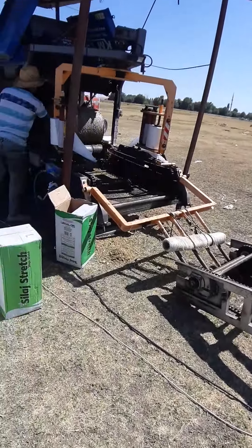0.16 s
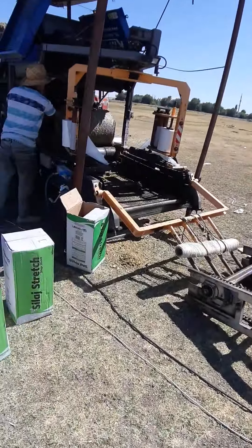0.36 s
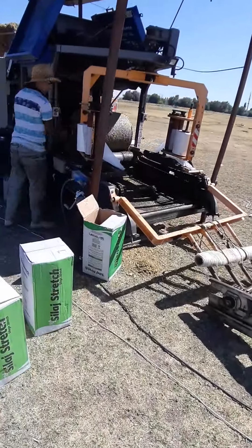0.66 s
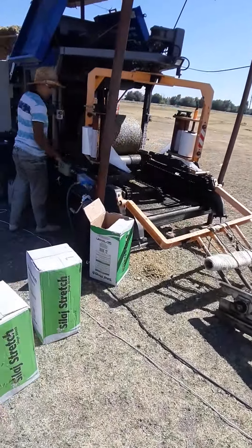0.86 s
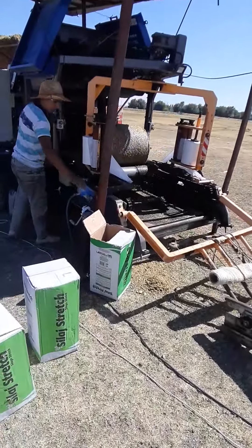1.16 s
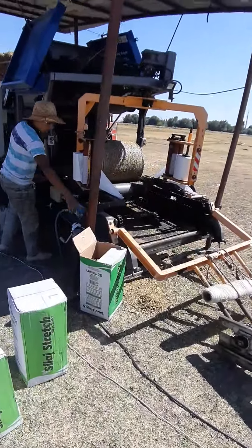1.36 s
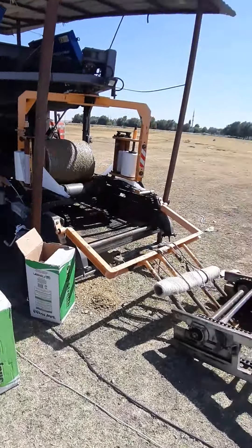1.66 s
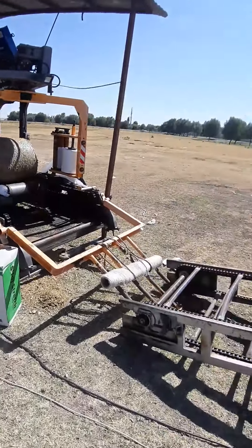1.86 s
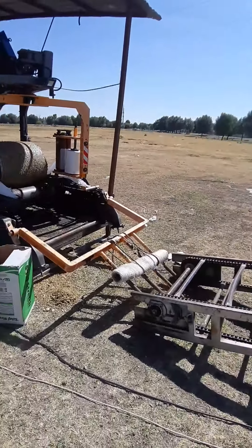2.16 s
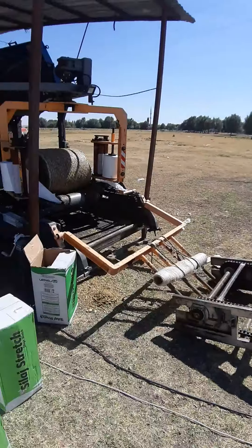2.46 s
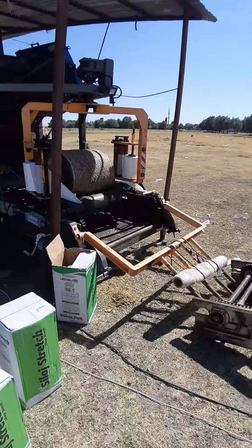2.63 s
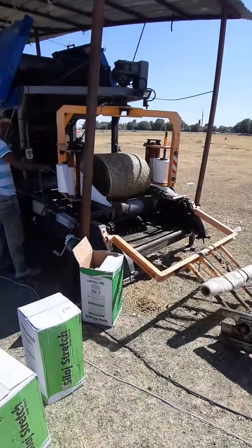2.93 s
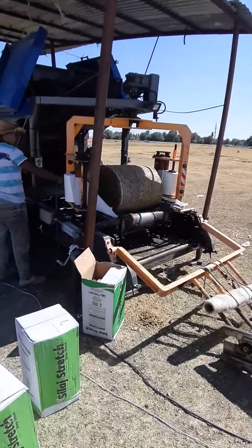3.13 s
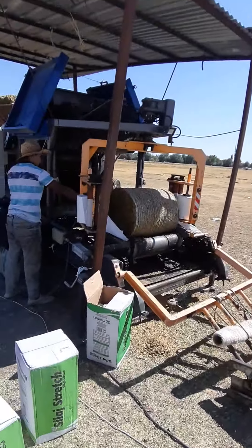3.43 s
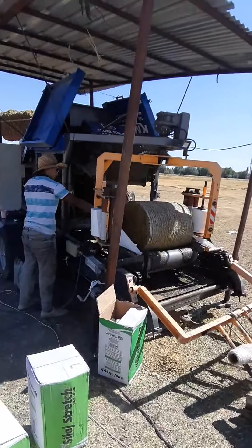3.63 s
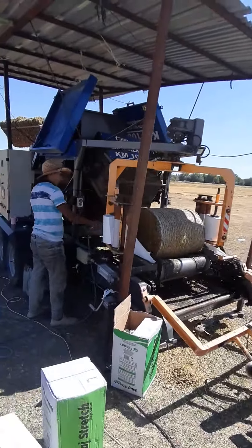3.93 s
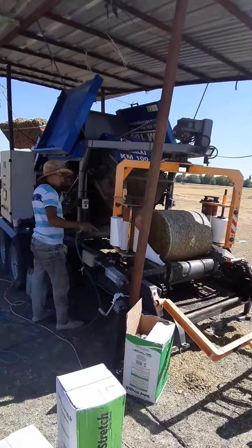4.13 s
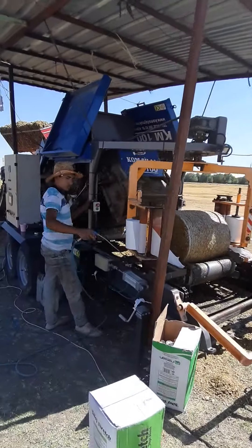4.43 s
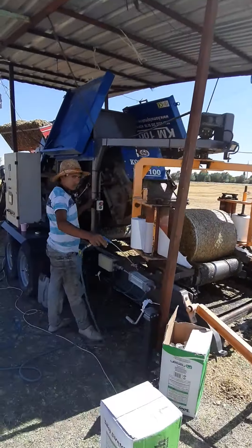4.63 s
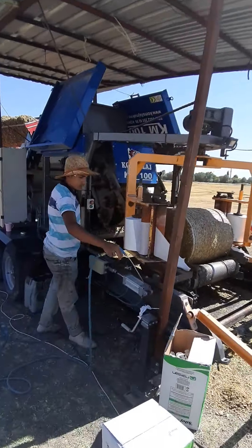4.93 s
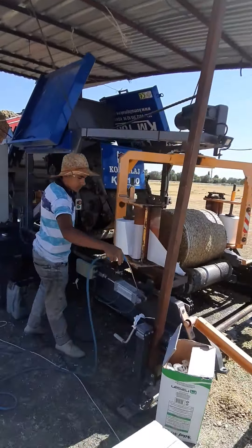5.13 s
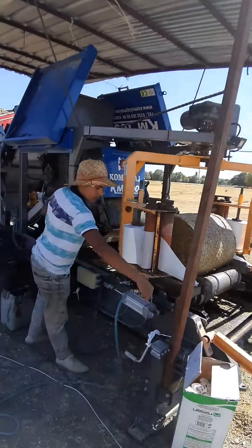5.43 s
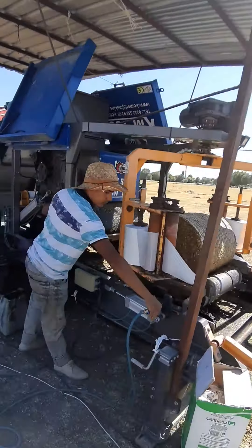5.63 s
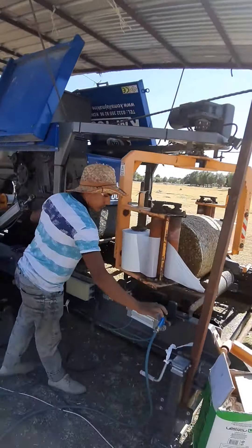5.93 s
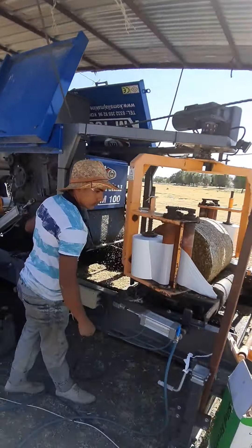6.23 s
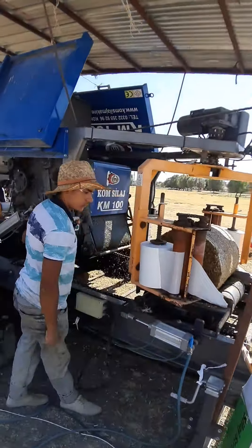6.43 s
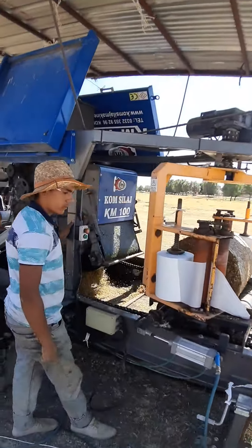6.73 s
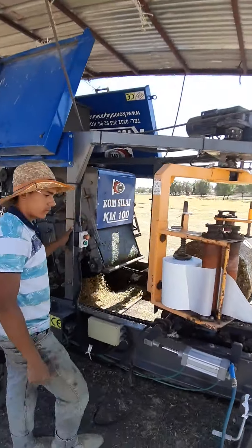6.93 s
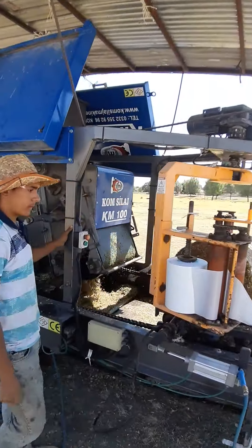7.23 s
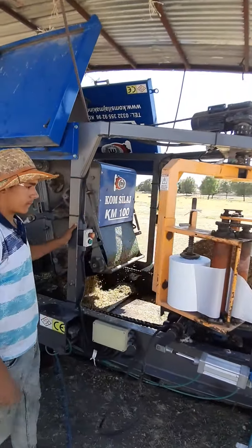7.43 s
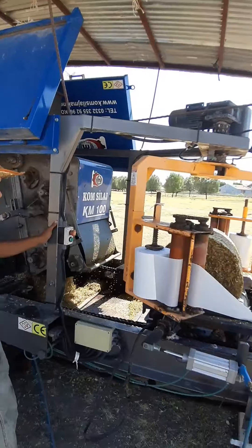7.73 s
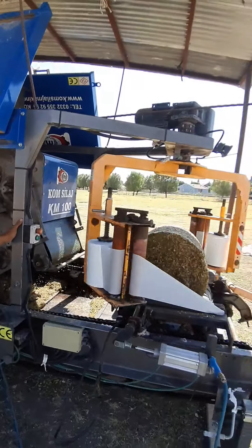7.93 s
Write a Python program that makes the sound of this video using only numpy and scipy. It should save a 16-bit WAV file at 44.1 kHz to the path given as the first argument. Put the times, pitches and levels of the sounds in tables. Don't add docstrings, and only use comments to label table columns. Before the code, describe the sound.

A compressor chugs rapidly beside a whining, humming baler under a metal shelter, as two roaring air-gun blasts drown everything, then the chugging returns.

```python
import sys
import numpy as np
from scipy import signal
from scipy.fft import rfft, irfft, next_fast_len
from scipy.io import wavfile
from scipy.ndimage import map_coordinates

SR = 44100
rng = np.random.default_rng(int(sys.argv[2]) if len(sys.argv) > 2 else 0)


def transcribe(signal):
    frames = np.atleast_2d(signal).T
    limited = np.clip(frames, -1, 1)
    pcm = np.round(limited * 32767).astype(np.int16)
    wavfile.write(sys.argv[1], SR, pcm)


def gain_from_db(level_db):
    decades = np.asarray(level_db, float) / 20
    return 10 ** decades


N = 356328

CRANK_TURNS_PER_S = 13.516
WALK_UP_S = (3.4, 5.8)

# start_s, gain_db, facing_db
LISTENER = [(0, 0, -1.5), (.6, 0, -1), (1.45, 1, -1), (1.9, 0.5, 2), (2.45, 1, 2), (2.75, -5.5, 2.5),
            (3.25, -3.5, -0.5), (3.34, -32, 7), (5.6, -19, -2), (6.0, -20.5, 2), (6.3, -17.5, 1),
            (6.95, -16, 1), (7.2, -13, 0), (7.45, -7, 0.5), (7.7, -3, 0), (8.08, -2, -1.5)]
# start_s, lag_samples
LEFT_LAG = [(0, -4.5), (2.2, -2), (3.2, 1.1), (5.0, 3.5), (6.5, 4.5), (8.08, 6)]

# start_s, delay_ms
SLAP_ARRIVAL = [(0, 39.8), (1.5, 40.5), (3.1, 41.1), (6.0, 37.8), (6.75, 39.6), (8.08, 43.0)]
# after_first_ms, intake_thump_db, far_face_ring_db, near_face_ring_db
VALVE_SLAPS = [
    (0.01, 7.5, -2, 14),
    (4.45, 1.5, -5.5, -3),
    (14.93, 8.5, -33, 15),
    (17.52, 4.5, -47, -28),
    (20.03, -2.5, -51, -21),
    (23.32, -15, 8.5, 1),
    (26.97, -6, -1, 3.5),
    (35.1, -12, 4, -7),
    (51.1, -4, -59, 5.5),
]
# pitch_hz, level_db, t60_s
INTAKE_FAR = [(473, 24, 0.018), (463, -12.5, 0.01), (316, -16, 0.01), (277, -3, 0.014)]
# pitch_hz, level_db, t60_s
INTAKE_NEAR = [(398, -0.5, 0.011), (288, -9, 0.0093)]
# pitch_hz, level_db, t60_s
INTAKE_THROAT = [(556, -0.5, 0.033), (490, -1, 0.031)]
# pitch_hz, level_db, t60_s
CASING_FAR = [(800, -7, .07), (838, -5, .16), (878, -3, .4), (920, -10, .14), (660, -9, .1)]
# pitch_hz, level_db, t60_s
CASING_NEAR = [(674, -4, 0.052), (741, -4, 0.078), (800.3, 7, 0.058), (883.3, 7, 0.13), (967, 6, 0.11),
               (1188, 2.5, 0.1)]

# start_s, flow_db, roar_off_struck_parts_db, nozzle_aim_at_listener_db
FIRST_BLAST = [
    (2.44, -34, -4, 7),
    (2.47, -22.5, -8, -1.5),
    (2.6, -25, -7, 0.5),
    (2.7, -21, -10.5, -2),
    (2.75, -28.5, -9, 3.5),
    (2.83, -22, -6.5, -1),
    (2.89, -30, -7.5, 2),
    (3.2, -34.5, -7, 4),
    (3.255, -33, -12, -4),
]
# start_s, flow_db, roar_off_struck_parts_db, nozzle_aim_at_listener_db
SECOND_BLAST = [
    (3.275, -24, -13, 0.5),
    (3.46, -22.5, -9, -0.8),
    (3.75, -26, -5.5, 8.5),
    (4.5, -26.5, -2.5, 4.5),
    (4.85, -25, -7, 4),
    (5.3, -25, -10, 1.5),
    (5.85, -23.5, -15.5, -0.5),
    (6.03, -26, -18, -3),
    (6.15, -20.5, -26, -11.5),
]
# start_s, open_0_to_1
TRIGGER = [
    (2.438, 0),
    (2.452, 1),
    (6.155, 1),
    (6.185, 0),
]
# start_s, length_s, extra_db
JET_EDGES = [(2.468, 0.06, 2.5), (2.612, 0.0089, -6), (2.83, 0.015, -7), (3.29, 0.039, 8),
             (3.73, 0.0068, 6), (3.85, 0.1, 0), (4.25, 0.015, -16), (4.62, 0.029, 1.5), (4.81, 0.0073, 2),
             (5.06, 0.0099, 1.5), (5.7, 0.012, 0)]
# start_s, pitch_hz, level_against_hiss_db
FIRST_NOZZLE = [
    (2.44, 6900, -1),
    (2.6, 6870, -11),
    (2.85, 6690, -7),
    (3.25, 6900, -7),
]
# start_s, pitch_hz, level_against_hiss_db
SECOND_NOZZLE = [
    (3.3, 5600, -14),
    (3.751, 5500, -8),
    (4.299, 4750, -13),
    (4.85, 4960, -8),
    (5.1, 4780, -3),
    (5.3, 4600, -20),
    (5.95, 5600, -25),
    (6.061, 5480, 5.5),
    (6.18, 4600, -1),
]
# pitch_hz, density_db_per_hz
JET_COLOUR = [(90, -24), (200, -14.5), (400, -4), (1500, -4), (3000, 0), (5000, -2), (6300, -6),
              (7100, -1.5), (8200, -12.5), (9300, -11.5), (11000, -4.5), (12500, -2), (15000, 0.8),
              (16500, 3.5)]
# pitch_hz, likeness_0_to_1
JET_LIKENESS = [(150, 0.13), (600, 0.073), (2000, 0.14), (5000, 0.081), (8000, 0.32), (12000, 0.07),
                (15000, 0.42)]

# pitch_hz, density_db_per_hz
HUM_COLOUR = [(40, -32), (160, -16.5), (300, -9.5), (500, -2), (1000, -3), (1900, -8), (2300, -11.5),
              (3200, -12.5),
              (6300, -19), (7100, -16.5), (7800, -25), (9300, -28), (12800, -24), (16500, -26)]
# pitch_hz, likeness_0_to_1
HUM_LIKENESS = [(100, 0.14), (300, 0.96), (700, 0.19), (2000, 0.59), (3100, 0.12), (4500, 0.25),
                (7000, 0.028), (15000, 0.13)]
# afar_db, up_close_db
HUM_LEVELS = [
    (-45, -49.5),
    (-40.5, -38.5),
    (-37, -25.5),
    (-40.5, -46),
    (-50, -42.5),
]
# start_s, length_s, level_db, sizzle_against_it_db
LEAKS = [
    (0, .15, -33.5, -5),
    (6.172, 0.17, -35, -1.5),
    (7.96, .2, -29, -7),
]
# start_s, length_s, level_db
LEAK_WHISTLES = [
    (7.82, 0.11, -29),
]
# pitch_hz, width_hz, afar_db, up_close_db
GEAR_WHINES = [(2255, 110, -6.5, -5), (2494, 71, -9.5, -10), (2745, 19, -14.5, -10.5),
               (3460, 18, -13.5, -18), (5660, 250, -9.5, -17), (2190, 30, -38, -6), (2374, 170, -10, -7)]
# start_s, length_s, level_db
LOW_SLIPS = [
    (1.04, 0.028, -38),
    (1.32, .04, -32),
    (1.547, 0.049, -27.5),
    (1.73, 0.069, -29.5),
    (2.058, .02, -39),
    (2.216, 0.012, -32),
    (6.42, 0.14, -42.5),
    (7.66, .04, -32),
]
# start_s, length_s, level_db
HIGH_SLIPS = [
    (1.3, .05, -43),
    (1.48, .8, -41.5),
]

# start_s, length_s, start_hz, end_hz, level_db
SQUEAKS = [
    (.012, .03, 6100, 6050, -35),
    (.12, .048, 5080, 4900, -25),
    (.09, .05, 10700, 10700, -45),
    (2.47, .06, 1950, 1950, -31),
    (2.6, .03, 2480, 2480, -30),
    (2.6, .07, 1520, 1510, -28),
    (2.7, .05, 1520, 1520, -34),
    (2.78, .09, 1500, 1510, -30),
    (2.9, .06, 1480, 1490, -33),
    (7.14, .05, 1400, 1400, -43),
]
# start_s, level_db, centre_hz, t60_s
VALVE_PUFFS = [
    (1.62, -22, 6600, .03),
    (6.645, -33.5, 4200, 0.12),
    (7.161, -14, 3800, 0.062),
    (7.941, -10, 3740, 0.11),
]

# pitch_hz, density_db_per_hz
BREEZE_COLOUR = [(12, -54), (20, -31), (38, -19.5), (97, -2.5), (195, 0.5), (234, -10), (260, -3.5),
                 (340, -3.5), (570, -120)]
# start_s, length_s, level_db
GUSTS = [(0, 0.17, -37.5), (.79, 0.011, -43), (1.06, .04, -41), (1.72, 0.024, -42.5), (2.4, 0.11, -41.5),
         (2.79, .02, -55), (2.97, 0.012, -49), (3.22, .03, -51.5), (4.1, 0.38, -58), (4.7, 0.089, -50.5),
         (4.98, 0.072, -50), (5.24, 0.07, -50), (5.65, 0.22, -48.5), (6.1, .05, -52), (7.4, .05, -51),
         (7.7, 0.026, -46), (7.95, .13, -49.5)]


def compressor():
    facing_db = in_time(LISTENER)[1]
    turns = np.arange(-2, 110) / CRANK_TURNS_PER_S
    turns = turns + np.interp(turns, *np.transpose(SLAP_ARRIVAL)) / 1000
    lead_s = 0.2
    strikes = np.zeros((3, N + SR))
    for ms, *strength_db in VALVE_SLAPS:
        at = ((turns + ms / 1000 + lead_s) * SR).astype(int)
        strikes[:, at] = -gain_from_db(np.c_[strength_db] + 1.2 * rng.standard_normal((3, len(at))))
    intake_hits, far_hits, near_hits = strikes

    near_ring = 0
    for mode in CASING_NEAR:
        late_ms = 2.478 * (min(mode[0], 1000) - 800) / 100
        near_ring = near_ring + np.roll(ring(near_hits, [mode]), int(late_ms * SR / 1000))
    bodies = [ring(intake_hits, INTAKE_FAR), ring(intake_hits, INTAKE_NEAR), ring(intake_hits, INTAKE_THROAT),
              ring(far_hits, CASING_FAR), near_ring]

    port = signal.butter(2, [290, 1150], "band", fs=SR, output="sos")
    start = int(lead_s * SR)
    heard = [rms_one(signal.sosfilt(port, body)[start:start + N]) for body in bodies]
    intake_far, intake_near, throat, face_far, face_near = heard

    near = closeness()
    thump = (1 - near) * intake_far + near * intake_near
    casing = (1 - near) * face_far + near * face_near
    out = gain_from_db(as_heard(-28.5, -27) + facing_db) * thump
    out += gain_from_db(as_heard(-41, -60) + 3.1 * facing_db) * throat
    out += gain_from_db(as_heard(-29.5, -25) - facing_db + 0.5) * casing
    return out + gain_from_db(as_heard(-41, -46)) * casing_tone(turns)


def casing_tone(turns):
    crank = np.interp(np.arange(N) / SR, turns, np.arange(len(turns)))
    return np.sqrt(2) * np.sin(2 * np.pi * 65 * crank) * gain_from_db(drift(3.5))


def air_gun():
    flow_db, roar_db, aim_db = in_time(FIRST_BLAST + SECOND_BLAST)
    edge_db = swells(JET_EDGES, 386, 159, 0)
    body_db = flow_db + roar_db + edge_db
    hiss_db = flow_db + 0.13 * edge_db
    hollow, = in_time([(3.26, 0), (3.28, 1), (4.53, 1), (4.55, 0)])
    second = np.arange(N) > SECOND_BLAST[0][0] * SR
    layers = [
        (330, 620, body_db - 18.5 + 13 * hollow),
        (720, 1050, body_db - 5.5),
        (1100, 2300, body_db - 2),
        (2500, 3500, body_db + np.where(second, -3.5, 0)),
        (3900, 7400, hiss_db),
        (7800, 10500, hiss_db + aim_db / 2 + np.where(second, -11, -6.5)),
        (11000, 15700, hiss_db + aim_db)]
    zones = [(low, high) for low, high, _ in layers]
    levels_db = [level_db for *_, level_db in layers]
    jet = turbulence(JET_COLOUR, JET_LIKENESS, zones, levels_db, patchy_db=1.77, gust_db=1.0)
    nozzle_hz, whistle_db = in_time(FIRST_NOZZLE + SECOND_NOZZLE)
    jet += gain_from_db(hiss_db + whistle_db) * whistle(nozzle_hz, width_hz=230)
    return in_time(TRIGGER)[0] * jet


def baler():
    peak_s = 0.0757
    load = np.cos(2 * np.pi * CRANK_TURNS_PER_S * (np.arange(N) / SR - peak_s))
    return machine_hum() + gear_whines(load) + belt_squeal(load) + leak_whistle()


def machine_hum():
    rumble_db, growl_db, clatter_db, rustle_db, sizzle_db = (as_heard(*layer) for layer in HUM_LEVELS)
    leak_rows = [row[:3] for row in LEAKS]
    sizzle_rows = [(s, length, db + against_db) for s, length, db, against_db in LEAKS]
    rustle_db = swells(leak_rows, 24, 30.5, rustle_db)
    sizzle_db = swells(sizzle_rows, 24, 48, sizzle_db)
    levels_db = [rumble_db, growl_db, clatter_db, rustle_db, sizzle_db]
    zones = [(150, 330), (480, 700), (1050, 3300), (4000, 7400), (9500, 15700)]
    return turbulence(HUM_COLOUR, HUM_LIKENESS, zones, levels_db, patchy_db=1.78, gust_db=0.75)


def gear_whines(load):
    clatter_db = as_heard(*HUM_LEVELS[2])
    out = 0
    for hz, width_hz, afar_db, close_db in GEAR_WHINES:
        against_db = afar_db + closeness() * (close_db - afar_db)
        out = out + gain_from_db(clatter_db + against_db + 1.5 + 0.43 * load) * whistle(hz, width_hz / 2)
    return out


def belt_squeal(load):
    turned = 1.5 - 3 * closeness()
    out = 0
    for hz, steady_db, slips in [(3757, (-48.5, -33), LOW_SLIPS), (5245, (-73, -55), HIGH_SLIPS)]:
        squeal_db = swells(slips, 133, 133, as_heard(*steady_db))
        wobbling = np.cumsum(hz * (1 + 0.005 * drift(60))) / SR
        tone = np.sin(2 * np.pi * wobbling + np.array([np.zeros(N), turned]))
        out = out + gain_from_db(squeal_db - 3 + 7 * load + 1.5 * drift(12)) * tone
    return out


def leak_whistle():
    return gain_from_db(swells(LEAK_WHISTLES, 300, 130, -99)) * whistle(11400, width_hz=450)


def squeaks():
    out, t = np.zeros((2, N)), np.arange(SR // 5) / SR
    for s, length, start_hz, end_hz, level_db in SQUEAKS:
        along = np.clip(t / length, 0, 1)
        tone = np.sin(2 * np.pi * np.cumsum(start_hz + (end_hz - start_hz) * along) / SR)
        rough = 1 + 0.5 * np.sin(2 * np.pi * 70 * t)
        swell = np.sqrt(np.sin(np.pi * along) + 1e-12)
        at = int(s * SR)
        out[:, at:at + len(t)] += gain_from_db(level_db) * swell * rough * tone
    return out


def valve_puffs():
    out, t = np.zeros((2, N)), np.arange(SR // 5) / SR
    for s, level_db, centre_hz, t60 in VALVE_PUFFS:
        band = signal.butter(2, [centre_hz * 0.4, centre_hz * 1.7], "band", fs=SR)
        burst = signal.lfilter(*band, rng.standard_normal((2, len(t))))
        burst *= gain_from_db(level_db - 60 * t / t60) * np.minimum(t / 0.0026, 1)
        at = int(s * SR)
        out[:, at:at + len(t)] += burst[:, :N - at]
    return out


def shelter(x):
    t60_s, roof_cut_hz = 0.19, 900
    size = next_fast_len(N + SR)
    turn = 2j * np.pi * np.fft.rfftfreq(size, 1 / SR)
    dull = 1 / (1 + turn / (2 * np.pi * roof_cut_hz))
    loops = [gain_from_db(-60 * lag / t60_s) * dull * np.exp(-turn * lag) for lag in rng.uniform(0.008, 0.04, 12)]
    sides = [sum((-1) ** k * g / (1 - g) for k, g in enumerate(loops[ear::2])) for ear in range(2)]
    return irfft(rfft(x, size) * sides, size)[:, :N]


def breeze():
    calm_db = -53.5 + 0.3 * in_time(LISTENER)[0]
    wind_db = swells(GUSTS, 72, 120, calm_db)
    likeness = [(20, 0.01), (260, 0.2)]
    return turbulence(BREEZE_COLOUR, likeness, [(30, 170)], [wind_db], patchy_db=3.0, gust_db=3.0)


def ring(clicks, modes):
    out = 0
    for hz, level_db, t60 in modes:
        r, w = gain_from_db(-60 / (t60 * SR)), 2 * np.pi * hz / SR
        gain = gain_from_db(level_db) * np.sin(w)
        out = out + signal.lfilter([0, gain], [1, -2 * r * np.cos(w), r * r], clicks + 1e-18)
    return out


def whistle(hz, width_hz):
    phase = 2 * np.pi * np.cumsum(np.broadcast_to(hz, N)) / SR
    mid, side = (drift(width_hz) * np.cos(phase) + drift(width_hz) * np.sin(phase) for _ in range(2))
    return rms_one(mid + 0.29 * side * np.array([[1], [-1]]))


def turbulence(spectrum, likeness, zones, levels_db, patchy_db, gust_db):
    size = next_fast_len(N)
    hz = np.maximum(np.fft.rfftfreq(size, 1 / SR), 1)
    mid, side = rfft(rng.standard_normal((2, size))) * gain_from_db(at_hz(spectrum, hz))
    alike = np.clip(at_hz(likeness, hz), -1, 1)
    pair = np.sqrt(1 + alike) * mid + np.sqrt(1 - alike) * side * [[1], [-1]]
    power = np.abs(pair.mean(axis=0)) ** 2 * 2 / size ** 2
    zone_db = [10 * np.log10(power[(hz > low) & (hz < high)].sum()) for low, high in zones]
    lifts = np.array([db - own_db for db, own_db in zip(levels_db, zone_db)])
    centres = np.log2([np.sqrt(low * high) for low, high in zones])
    out, gusts = 0, gust_db * drift(47)
    for octave in np.arange(np.log2(spectrum[0][0]), np.log2(spectrum[-1][0]) + 1 / 3, 1 / 3):
        share = np.cos(np.pi / 2 * np.clip(3 * (np.log2(hz) - octave), -1, 1)) ** 2
        weights = np.array([np.interp(octave, centres, row) for row in np.eye(len(zones))])
        level_db = weights @ lifts + gusts + patchy_db * drift(15.3)
        out = out + gain_from_db(level_db) * irfft(pair * share, size)[:, :N]
    return out


def swells(rows, rise_db_per_s, fall_db_per_s, floor_db):
    t = np.arange(N) / SR
    power = gain_from_db(2 * floor_db) + 0 * t
    for s, length, level_db in rows:
        rise_db = rise_db_per_s * np.maximum(s - t, 0)
        fall_db = fall_db_per_s * np.maximum(t - s - length, 0)
        power = power + gain_from_db(2 * (level_db - rise_db - fall_db))
    return 10 * np.log10(power)


def closeness():
    return np.interp(np.arange(N) / SR, WALK_UP_S, [0, 1])


def as_heard(afar_db, close_db):
    return in_time(LISTENER)[0] + afar_db + closeness() * (close_db - afar_db)


def drift(rate):
    r = np.exp(-40 * np.pi * rate / SR)
    slow = signal.lfilter([1], [1, -2 * r, r * r], rng.standard_normal(N // 20 + 4002))[4000:]
    return np.interp(np.arange(N) / 20, np.arange(len(slow)), rms_one(slow))


def in_time(rows):
    s, *columns = np.transpose(rows)
    return [np.interp(np.arange(N) / SR, s, c) for c in columns]


def at_hz(points, hz):
    point_hz, values = np.transpose(points)
    return np.interp(np.log(hz), np.log(point_hz), values)


def rms_one(x):
    return x / np.sqrt(np.mean(x ** 2) + 1e-20)


def scene():
    pump = compressor()
    placed = pump * gain_from_db(np.array([[-1.3], [1.3]])) + gain_from_db(-21) * shelter(pump)
    machines = (air_gun() + baler()) * gain_from_db(np.array([[-0.4], [0.4]]))
    left, right = placed + machines + breeze()
    lag, = in_time(LEFT_LAG)
    left = map_coordinates(left, [np.arange(N) - lag], order=3, mode="nearest")
    return np.array([left, right]) + squeaks() + valve_puffs()


def roll_off(x):
    return signal.sosfilt(signal.butter(12, 17070, fs=SR, output="sos"), x)


def record(dry):
    rounded = 0.94 * np.tanh(dry / 0.97)
    top_cut = signal.ellip(14, 0.3, 85, 15740, fs=SR, output="sos")
    return roll_off(signal.sosfilt(top_cut, rounded))


dry = scene()
out = record(dry)
transcribe(out)
```